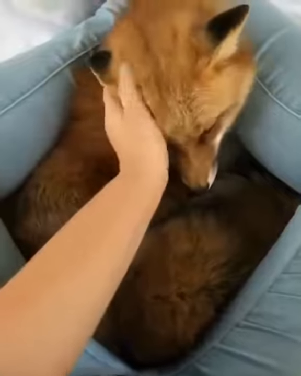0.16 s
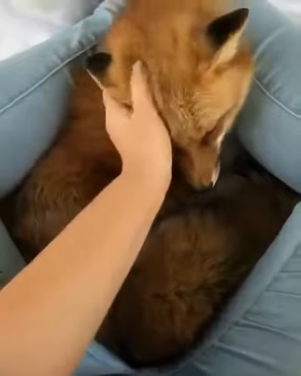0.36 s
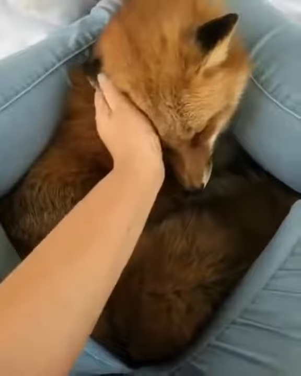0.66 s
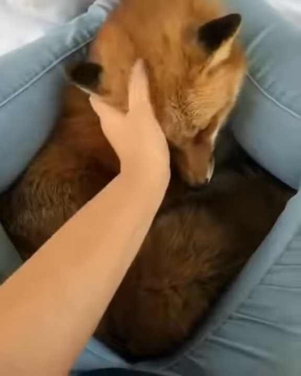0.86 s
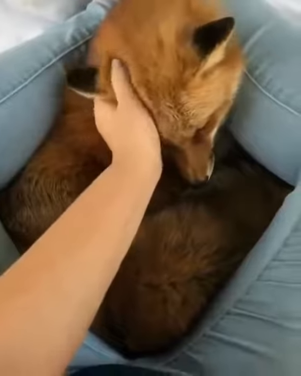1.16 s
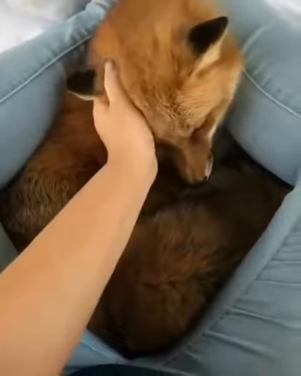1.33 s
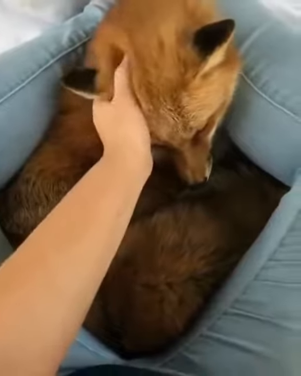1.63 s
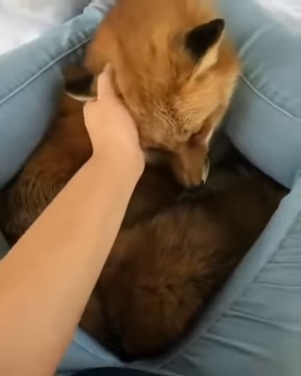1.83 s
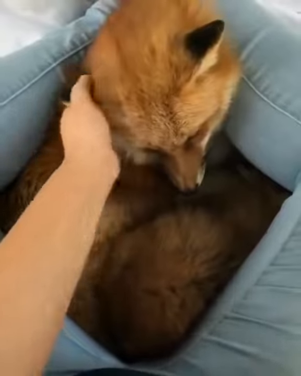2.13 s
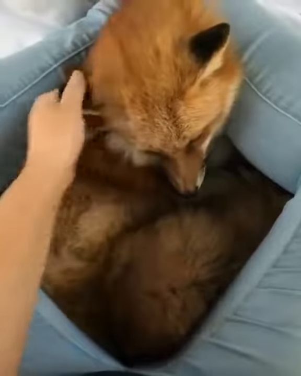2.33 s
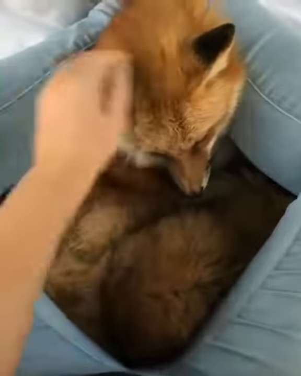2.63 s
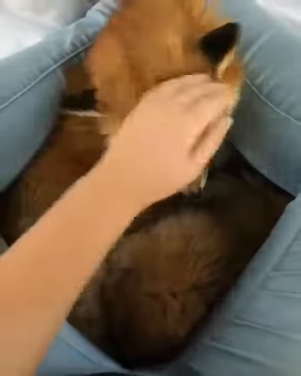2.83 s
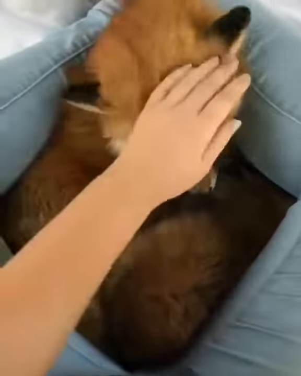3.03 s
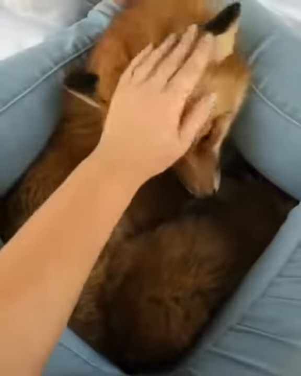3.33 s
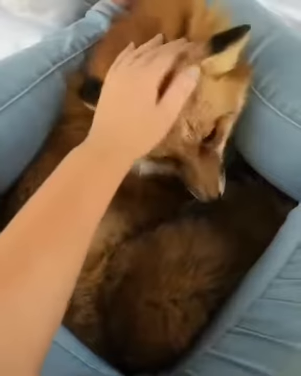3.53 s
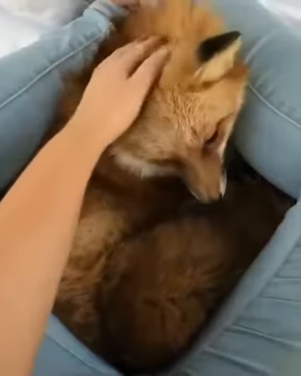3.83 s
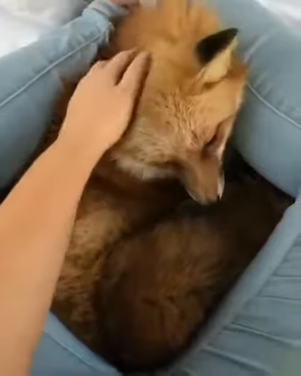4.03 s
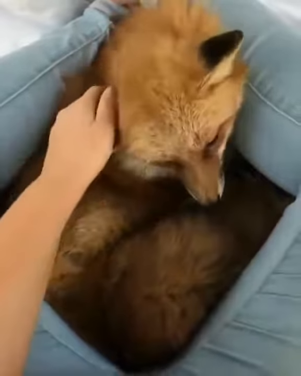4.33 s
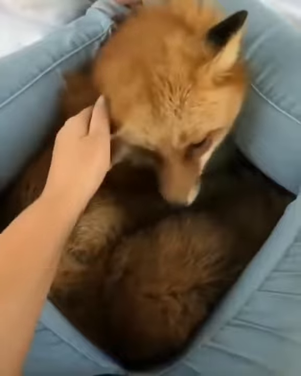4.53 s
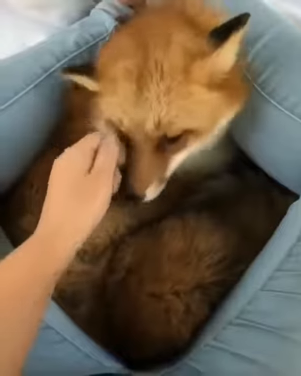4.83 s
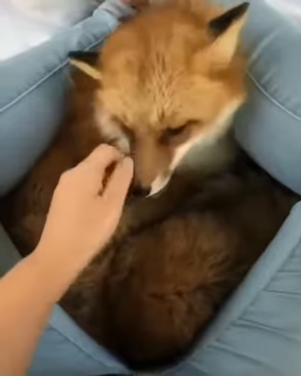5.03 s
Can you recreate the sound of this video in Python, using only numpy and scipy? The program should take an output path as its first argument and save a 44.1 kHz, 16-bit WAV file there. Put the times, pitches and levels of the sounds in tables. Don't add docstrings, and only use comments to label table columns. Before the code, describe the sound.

A fox whines softly and waveringly through its closed muzzle close by, then louder and rougher with clicks and brief yips, in a quiet room.

```python
import sys
import numpy as np
from scipy import signal
from scipy.io import wavfile
from scipy.ndimage import uniform_filter1d

SR = 44100
rng = np.random.default_rng(int(sys.argv[2]) if len(sys.argv) > 2 else 0)


def field_ratio(decibels):
    return 10 ** (np.asarray(decibels, dtype=float) / 20)


def pcm_store(signal):
    levels = np.round(np.clip(np.atleast_2d(signal), -1, 1) * 32767)
    wavfile.write(sys.argv[1], SR, levels.astype(np.int16).T)


N = 228310

# f/Hz, level/dB
HISS = [(18, -76), (30, -48), (59, 2), (141, -7), (174, 3), (203, -10), (349, -10.5), (501, -20.5),
        (648, -17.5), (1520, -14), (1780, -19), (3220, -18), (4160, -23), (5300, -25.5), (13300, -29.5),
        (14400, -25)]
# f/Hz, width/Hz, level/dB
HUMS = [(56.5, 1.5, -75), (145, 25, -76)]

# (side line level/dB, [(t/s, pitch f/Hz, pitch line level/dB)]) clean notes, quiet in the
CLEAN = [
    (-45, [(.062, 522, -59), (.095, 544, -55.5), (.11, 527, -56), (.13, 468.4, -49), (.155, 451.7, -49), (.2, 435.4, -45), (.235, 423, -44.5)]),
    (-42.5, [(0.356, 352.5, -47), (0.365, 359, -41.5), (0.44, 335.8, -42.5), (0.468, 344, -39), (0.486, 362.6, -42.5), (0.494, 368, -35.5), (0.505, 408, -57)]),
    (-56, [(.985, 280.6, -44), (1.022, 299.4, -44), (1.032, 302, -72)]),
    (-41.5, [(1.296, 343.4, -59), (1.303, 315.7, -42.5), (1.324, 237, -52.5), (1.41, 258.6, -50), (1.445, 242, -52.5), (1.524, 265.4, -50), (1.72, 250.2, -49.5), (1.752, 258.4, -44), (1.772, 230, -53)]),
    (-46.5, [(2.058, 351.5, -67), (2.066, 351.4, -41), (2.082, 288.6, -46.5), (2.12, 244, -53), (2.14, 237.2, -54)]),
    (-50, [(2.285, 258.5, -47), (2.32, 221.5, -52.5), (2.345, 236.4, -52), (2.352, 246, -41.5), (2.366, 254.7, -69)]),
         (-41, [(3.158, 375, -38), (3.175, 392.7, -36.5), (3.195, 440, -38), (3.213, 443, -48)]),
    (-39.5, [(3.217, 421, -41), (3.228, 416, -33), (3.24, 444, -32.5), (3.25, 481, -45)]),
    (-40, [(3.372, 455, -40), (3.385, 454.6, -37.5), (3.41, 457, -39.5), (3.42, 450, -42)]),
    (-64, [(4.055, 423.6, -73), (4.075, 396.5, -30.5), (4.1, 283.4, -35), (4.12, 230, -43.5), (4.145, 185, -44)]),
    (-59, [(4.448, 250.6, -69), (4.46, 272, -38.5), (4.471, 298.6, -41)]),
    (-45, [(4.64, 254.1, -34), (4.667, 296.1, -38), (4.705, 357.8, -38.5), (4.713, 379.6, -41), (4.721, 382, -54)]),
    (-44.5, [(4.723, 399, -36), (4.735, 405.3, -48), (4.745, 416.3, -38), (4.765, 425.6, -39), (4.778, 416.6, -30), (4.8, 415, -30.5), (4.824, 348, -31), (4.845, 434.8, -31), (4.86, 440, -42.5)]),
    (-35, [(5.018, 496, -52), (5.034, 515, -46.5), (5.045, 530.7, -49.5), (5.065, 542.7, -51.5), (5.09, 506.3, -44), (5.125, 482.3, -45), (5.14, 513, -46), (5.148, 545, -75)]),
]
HALVED = [
    (-53.5, [(0, 278, -64.5), (.04, 233.8, -63.5), (.068, 291.5, -52.5)]),
    (-50, [(.232, 283, -50.5), (.27, 317.3, -51), (.3, 228.4, -59), (.33, 233.8, -58.5), (.36, 250, -58.5)]),
    (-54, [(.855, 271, -54.5), (.9, 241.5, -54.5), (.94, 246, -56), (.99, 282.3, -51.5)]),
    (-55, [(1.386, 245.6, -79), (1.405, 251.3, -72)]),
    (-55, [(2.135, 230, -67), (2.17, 254.3, -55.5), (2.2, 288.6, -56.5), (2.213, 225, -59.5), (2.24, 250, -56.5), (2.265, 273, -51.5), (2.295, 282, -61)]),
    (-43.5, [(4.12, 250.3, -39.5), (4.14, 255, -40), (4.162, 250, -44.5), (4.185, 260.7, -41.5), (4.21, 281, -55)]),
    (-37, [(4.568, 305.7, -34.5), (4.583, 282.5, -39), (4.6, 243.2, -34.5), (4.62, 246.2, -37), (4.642, 254, -35)]),
    (-40.5, [(4.953, 304, -37), (4.97, 304.4, -36), (4.99, 288, -39.5), (5.0, 313, -42.5), (5.01, 370, -39)]),
]
THIRDS = [
    (-58, [(4.058, 435.3, -38.5), (4.085, 466, -40.5), (4.125, 363, -34.5)]),
    (-37, [(4.906, 335, -42), (4.918, 342.4, -32), (4.94, 336, -34), (4.955, 325, -35.5)]),
]
BEATING = [
    (-43.5, [(3.012, 345.3, -36.5), (3.032, 357, -36), (3.052, 366.8, -31.5), (3.064, 339.4, -30.5), (3.074, 333.8, -29.5), (3.12, 340.1, -34), (3.138, 344.5, -33), (3.152, 377.4, -36), (3.162, 380.7, -31)]),
    (-47.5, [(3.248, 360.3, -35), (3.256, 378.4, -33), (3.28, 382.4, -33.5), (3.294, 354.6, -33.5), (3.33, 356.7, -36), (3.344, 393.8, -36), (3.358, 387.4, -34.5), (3.37, 436.3, -38.5), (3.378, 430, -36)]),
    (-63, [(3.418, 416, -35), (3.434, 411.4, -36.5), (3.458, 434.4, -36.5), (3.474, 381, -35.5), (3.504, 431, -36.5), (3.532, 400.5, -37), (3.576, 401, -32), (3.585, 412, -35.5), (3.596, 356.5, -31), (3.606, 341, -36), (3.615, 323.7, -55)]),
]
SWELL_SHARES = [0.13, 1, 0.83, 0.12]
# f/Hz, level/dB
MUZZLE = [(70, -11), (125, -6.5), (380, 11), (560, -6), (720, -16.5), (1050, -23.5), (1650, -22.5),
          (2750, -29.5), (3200, -34.5), (7000, -62)]
# t/s, overtone level/dB, extra tilt/(dB per octave), nasal dip f/Hz,
# upper over middle throat resonance level/dB
SHAPE = [(0, 16.5, 2, 3380, 1), (.09, 1.5, 2, 3400, 10), (.2, 9, -4, 2500, 6), (.36, 7, 1, 1576, 0),
         (0.501, 6, 0.5, 1557, -5), (0.9, -1.5, 5, 1200, 2.5), (1.3, -15.5, 1.5, 888.5, 19.5),
         (2.3, 2.5, -2, 760.7, -7), (3.0, 1, 6, 2328, 18.5), (3.07, 8, -4, 2360, 8),
         (3.2, 0.5, 1, 2220, -9), (3.4, 0, 4, 2170, 3), (3.6, 21, -12, 2295, -1), (4.1, -6, 1, 2266, 1),
         (4.63, 12.5, -9.5, 1998, -6), (4.69, 7, -0.5, 2000, 8), (4.78, 6, 2, 2188, 4),
         (4.86, 6, 1.5, 2202, 0), (4.93, -9, 8, 2196, 11.5), (4.99, -2, 4.5, 2280, 9.5),
         (5.04, 8.5, -4.5, 3170, 11), (5.14, -1, -0.5, 2707, 7)]
# t/s, resonance f/Hz
FLARE = [(.04, 5600), (.09, 5480), (0.442, 5210), (.49, 6560), (.6, 5360), (2.998, 5420), (3.06, 6270),
         (3.11, 6450), (3.165, 6052), (3.2, 4284), (3.234, 5533), (3.27, 6800), (3.35, 6080), (4.0, 5647),
         (4.9, 6120), (5.03, 5450), (5.071, 5100), (5.13, 5860)]

# (fizz beside the flow level/dB, [(t/s, airflow
# level/dB, nose over throat level/dB)])
BREATHS = [
    (-7.5, [(0, -69, -24), (.055, -63, -4.5), (.09, -79, -5), (.22, -72, -32), (.26, -65, -11), (.4, -71.5, -6), (.47, -72, 6), (.5, -70, 4), (.52, -70, -4)]),
    (-12, [(.82, -71, -8), (.87, -67.5, -9), (.91, -69.5, 2), (.95, -63, -3), (.99, -68, -4), (1.04, -82, 0)]),
    (4, [(2.15, -90, 2), (2.22, -82, 3), (2.37, -78, 8)]),
           (-8.5, [(3.005, -71, -5), (3.03, -57, -6), (3.055, -55, -3), (3.11, -64.5, -6.5), (3.165, -61.5, -1), (3.22, -63, -10), (3.27, -61.5, -8), (3.35, -59, -4), (3.395, -64.5, -6), (3.45, -58.5, -3), (3.55, -61, -16), (3.62, -67, 1)]),
    (-13, [(4.04, -52, -11), (4.066, -48, -10), (4.11, -55.5, -19), (4.21, -77, 5)]),
    (0, [(4.495, -58, -7), (4.508, -63, -10), (4.53, -64, -10)]),
    (-3.5, [(4.556, -47, -17), (4.572, -48, -14)]),
    (-7.5, [(4.58, -45, -21), (4.6, -50, -27), (4.65, -56.5, -28), (4.7, -64.5, -9.5), (4.77, -61, -31), (4.815, -52, 2.5), (4.86, -65, -18)]),
    (-6.5, [(4.87, -39.5, -13), (4.885, -52.5, -9), (4.903, -44, -13), (4.918, -50.5, -18), (4.938, -49.5, -27), (4.95, -52.5, -20), (4.97, -57.5, -16), (5.0, -61, -28), (5.025, -63, -22), (5.06, -70, 11), (5.09, -61, 4), (5.12, -65, -3), (5.165, -71, -1)]),
]
# f/Hz, width/Hz, level/dB, share of the shape's upper level they follow
THROAT = [(705, 310, 17.5, -0.11), (1263, 280, 20, -0.2), (1690, 240, 13, 1), (2850, 330, 15, 0.023),
          (2583, 130, 13, -0.043)]
# f/Hz, width/Hz, level/dB
NOSTRILS = [(5515, 220, -2)]
# f/Hz, width/Hz, level/dB
FIZZ = [(6760, 21400, 15), (9000, 1400, 15), (11300, 2500, -30)]

# t/s, length/s, start f/Hz, end f/Hz, level/dB
THIN = [(0.493, 0.028, 3850, 3100, -66.5), (0.558, 0.019, 3230, 3440, -67),
        (0.584, 0.021, 3310, 2870, -67.5), (0.66, 0.037, 3350, 2720, -72),
        (0.691, 0.035, 2850, 3310, -64.5), (0.721, 0.0175, 3310, 3920, -66.5),
        (0.732, 0.018, 3900, 4160, -69), (0.814, 0.031, 3440, 3140, -67), (1.007, 0.032, 3350, 3338, -67.5),
        (1.06, 0.062, 3370, 3360, -77), (1.159, 0.039, 2443, 2680, -69.5), (1.211, 0.096, 2643, 2710, -77),
        (1.312, 0.035, 3194, 3100, -71), (2.212, 0.026, 3450, 3250, -78), (2.232, 0.045, 3230, 3230, -65),
        (2.309, 0.066, 3247, 3260, -77), (2.461, 0.029, 3620, 3050, -63), (2.804, 0.024, 3610, 3140, -64),
        (2.943, 0.049, 3430, 3590, -72), (3.571, .21, 3450, 3594, -68.5), (3.912, 0.099, 2994, 2872, -67.5)]
# t/s, length/s, start f/Hz, end f/Hz, level/dB
BLURRED = [(1.29, 0.072, 3520, 3260, -75), (1.385, 0.057, 2833, 2690, -68.5),
           (1.703, 0.11, 3640, 2930, -69), (1.839, 0.12, 3190, 2920, -72), (2.005, 0.041, 4115, 3980, -75),
           (2.03, 0.083, 3680, 3630, -77), (2.095, 0.057, 4090, 4190, -79), (2.14, 0.065, 4133, 3955, -71),
           (2.171, 0.075, 3734, 3240, -67), (2.48, 0.085, 3470, 3480, -72),
           (2.59, 0.059, 3600, 3380, -76.5), (2.76, 0.046, 3400, 3700, -80),
           (2.825, 0.078, 3520, 3480, -87), (2.895, 0.089, 3750, 4500, -73.5)]
# t/s, level/dB
PHRASES = [
    (0.16, -74),
    (1.326, -73),
    (2.444, -72.5),
    (3.619, -73.5),
]
# delay t/s, length/s, start f/Hz, end f/Hz, width/Hz, level/dB
PHRASE = [
    (0, 0.042, 8140, 7660, 302, 4.5),
    (.17, .16, 7000, 5880, 800, 0),
]

# t/s, peak level/dB, ring f/Hz
CREAKS = [(0.785, -44, 393), (0.82, -43, 360), (0.839, -43.5, 383), (2.9, -47.5, 333), (2.99, -45, 345),
          (3.006, -36.5, 174.2), (3.872, -37, 278), (3.888, -31, 293), (3.9, -36, 362.7),
          (4.471, -42.5, 371.7), (4.473, -43.5, 169.2), (4.481, -54, 360), (4.512, -57, 190),
          (4.892, -36, 591.3), (4.899, -43, 646.4), (5.149, -48.5, 420)]
# t/s, peak level/dB, ring f/Hz
CLICKS = [
    (3.007, -45.5, 5510),
    (4.5075, -52, 9000),
    (4.548, -46, 11800),
    (3.0276, -40.5, 5540),
    (3.043, -43, 5800),
    (3.0537, -39, 6400),
    (4.507, -35, 2920),
    (4.5483, -20, 2660),
    (4.562, -29, 2470),
]
# [(t/s, pitch f/Hz, level/dB)]
SECOND = [
    [(3.02, 480, -53.5), (3.045, 504.3, -39.5), (3.062, 520, -53.5)],
    [(3.066, 419, -61), (3.09, 431.4, -46), (3.112, 400.7, -52), (3.135, 401, -50)],
    [(3.145, 334.8, -52), (3.158, 347, -45), (3.175, 352, -41), (3.19, 368.3, -44)],
    [(3.262, 309.3, -46), (3.285, 302.5, -41), (3.31, 289.5, -52), (3.325, 300, -63)],
    [(3.332, 349, -52), (3.35, 347, -45), (3.37, 351.3, -41), (3.383, 365, -58)],
    [(3.42, 349.8, -48), (3.45, 351.8, -40.5), (3.475, 331.3, -45), (3.495, 338.7, -43.5), (3.52, 353, -50),
     (3.55, 334.6, -45), (3.575, 352, -42), (3.588, 360, -46), (3.596, 360, -55)],
]
# t/s, peak level/dB, pulse f/Hz, length/s, mouth shape (factor on its resonances)
YIPS = [
    (4.025, -43, 740, 0.001, 0.78),
    (4.0284, -21.5, 512, 0.0082, 1.01),
    (4.039, -28.5, 580, 0.018, 0.98),
    (4.545, -36.5, 670, 0.0064, 1.1),
    (4.5666, -31, 430, 0.0063, 1.01),
    (4.8699, -35, 660, 0.0029, 1.29),
    (4.874, -31.5, 510, 0.0082, 1.05),
    (4.889, -37.5, 500, 0.0024, 1.3),
    (4.896, -26.5, 550, 0.007, 1.263),
]
# f/Hz, width/Hz, level/dB
MOUTH = [(522.9, 372, 4.5), (1141.7, 362, 6), (1666, 312, 7), (2117, 713, 12.5), (2694, 171, 3),
         (5150, 1630, -27), (8270, 1310, -27), (12200, 3900, -36)]


def evened(x):
    return x / np.sqrt(np.mean(x ** 2) + 1e-20)


def read(points, hz):
    f, value = np.transpose(points)
    return np.interp(np.log(hz + 1), np.log(f + 1), value)


def add(mix, s, sound):
    part = mix[round(s * SR):][:len(sound)]
    part += sound[:len(part)]


def resonate(x, hz, width):
    turn = np.exp(2j * np.pi * np.cumsum(hz * np.ones(len(x))) / SR)
    r = np.exp(-np.pi * width / SR)
    return 2 * (turn * signal.lfilter([1 - r], [1, -r], x / turn)).real


def tract(x, modes):
    return sum(field_ratio(db) * resonate(resonate(x, hz, width), hz, width) for hz, width, db in modes)


def drift(seconds):
    size = round(seconds * SR)
    return evened(uniform_filter1d(uniform_filter1d(rng.standard_normal(N), size), size))


def curves(table):
    s, *columns = np.transpose(table)
    return np.array([np.interp(np.arange(N) / SR, s, c) for c in columns])


def played(tables, edge_s):
    gate = np.zeros(N)
    for rows in tables:
        gate[round(rows[0][0] * SR):round(rows[-1][0] * SR) + 1] = 1
    return uniform_filter1d(gate, round(edge_s * SR)), curves(np.vstack(tables))


def sunk_db(nostril_hz):
    return -16 * np.maximum(5100 - nostril_hz, 0) / 1000


def hiss():
    frames, hz = N // 256 + 5, np.fft.rfftfreq(1024, 1 / SR)
    a, b, patches = rng.standard_normal((frames, 513, 3)).T
    patches = evened(uniform_filter1d(uniform_filter1d(patches, 14, 0), 12, 1))
    spectrum = (a + 1j * b) * field_ratio(read(HISS, hz)[:, None] + 2.5 * patches)
    bed = signal.istft(spectrum, nperseg=1024, noverlap=768)[1][:N]
    return field_ratio(-64) * evened(bed)


def hums():
    return sum(field_ratio(db) * evened(tract(rng.standard_normal(N), [(hz, width, 0)])) for hz, width, db in HUMS)


def with_side_lines(notes, follow):
    tables = []
    for side_db, rows in notes:
        rows = np.array(rows)
        level_db = rows[:, 2]
        side = side_db + follow * (level_db - level_db.mean()) - level_db
        tables.append(np.c_[rows, side, rows[:, 0] - rows[0, 0]])
    return tables


def voice(notes, cycles, rough, under_db, follow):
    gate, (hz, level_db, side_db, age) = played(with_side_lines(notes, follow), 0.0079)
    on = gate > 0
    hz = (hz * (1 + 0.2475 * rough * drift(0.00271)))[on]
    side_db, age = side_db[on], age[on]
    turn, out = 2 * np.pi * np.cumsum(hz) / SR / cycles, np.zeros(N)
    nostril_hz = curves(FLARE)[0][on]
    lift_db, tilt_db, dip_hz, _ = curves(SHAPE)[:, on]
    tilt_db = tilt_db - 0.5 - 13 * age
    swells = [drift(0.0049)[on] for _ in range(7)]
    for k in range(1, 17 * cycles):
        steps = min(k % cycles, -k % cycles)
        if steps > 2 or (steps and k > 4 * cycles) or 3 * k < cycles:
            continue
        line_hz = hz * k / cycles
        db = read(MUZZLE, line_hz) - read(MUZZLE, hz) - 0.73 * max(steps - 1, 0)
        if k < cycles:
            db = db + under_db
        if k != cycles and (steps or cycles == 1):
            db = db + side_db
        if cycles > 1 and k > 1.55 * cycles:
            db = db - 7
        db = db + (27 + sunk_db(nostril_hz)) * np.exp(-((line_hz - nostril_hz) / 550) ** 2)
        db = db + tilt_db * np.log2(max(k / cycles, 1))
        if k > 1.7 * cycles:
            nasal_dip_db = -10.5 * np.exp(-((line_hz - dip_hz) / 320) ** 2)
            swell_in_db = -11 * np.exp(-age / .01)
            db = db + lift_db + nasal_dip_db + swell_in_db
        waver = 1 + (rough * (1.6 if steps else .6) + 0.022 * (k / cycles - 1)) * swells[k % 7]
        out[on] += field_ratio(db) * waver * np.cos(k * turn + rng.uniform(0, 2 * np.pi))
    return np.sqrt(2) * field_ratio(level_db) * gate * out


def whine():
    clean, halved, thirds, beating = SWELL_SHARES
    return (voice(CLEAN, cycles=1, rough=.03, under_db=0, follow=clean)
            + voice(HALVED, cycles=2, rough=.18, under_db=0, follow=halved)
            + voice(THIRDS, cycles=3, rough=.12, under_db=-19, follow=thirds)
            + voice(BEATING, cycles=6, rough=.21, under_db=-9, follow=beating))


def puffs(opening, depth, gust_db, gust_s):
    return rng.standard_normal(N) * field_ratio(gust_db * drift(gust_s)) * (1 + depth * opening)


def breath(folds):
    breaths = [[row + (fizz_db,) for row in rows] for fizz_db, rows in BREATHS]
    gate, (flow_db, nose_db, fizz_db) = played(breaths, 0.018)
    nostril_hz, upper_db = curves(FLARE)[0], curves(SHAPE)[-1]
    by_throat = 1 / np.sqrt(1 + field_ratio(2 * nose_db))
    opening = np.maximum(folds, 0) ** 2 / (uniform_filter1d(folds ** 2, 900) + 1e-7)
    throat_modes = [(hz, width, db + share * upper_db) for hz, width, db, share in THROAT]
    nose_modes = NOSTRILS + [(nostril_hz, 1100, sunk_db(nostril_hz))]
    throat = by_throat * evened(tract(puffs(opening ** 1.2, 1.8, 1.3, .008), throat_modes))
    nose = by_throat * field_ratio(nose_db) * evened(tract(puffs(opening, 1.8, 1.3, .008), nose_modes))
    fizz = field_ratio(fizz_db) * evened(tract(puffs(opening, .5, 1.6, .012), FIZZ))
    return gate * field_ratio(flow_db) * (throat + nose + fizz)


def room(x, t60=0.085):
    t = np.arange(200, 8000, 22) + rng.integers(0, 22, 355)
    taps = np.zeros(8100)
    taps[t] = rng.choice([-1., 1.], 355) * field_ratio(-60 * t / SR / t60)
    return signal.fftconvolve(x, taps / np.linalg.norm(taps))[:N]


def birds():
    out = np.zeros(N)
    notes = [row[:4] + (60, row[4]) for row in THIN]
    notes += [row[:4] + (340, row[4]) for row in BLURRED]
    notes += [(s + part[0], *part[1:5], db + part[5]) for s, db in PHRASES for part in PHRASE]
    for s, length, start_hz, end_hz, width, db in notes:
        size = round(length * SR)
        hz = np.linspace(start_hz, end_hz, size)
        blur = evened(tract(rng.standard_normal(size), [(hz, width, 0)]))
        tone = np.exp(-(width / 90) ** 2) * 2.5 * np.sin(2 * np.pi * np.cumsum(hz) / SR)
        add(out, s, field_ratio(db) * evened(blur + tone) * signal.windows.tukey(size, .5))
    return out


def creaks():
    out, t = np.zeros(N), np.arange(1200) / SR
    swell = (t / 0.0051) ** 3 * np.exp(3 - 3 * t / 0.0053)
    for s, db, hz in CREAKS:
        add(out, s - .002, field_ratio(db) * swell * np.sin(2 * np.pi * hz * t))
    return out


def clicks():
    out, t = np.zeros(N), np.arange(400) / SR
    tick = 0.36 * np.diff(np.exp(-t / .00006), prepend=0)
    for s, db, hz in CLICKS:
        ring = np.exp(-t / 0.0008) * np.sin(2 * np.pi * hz * t)
        add(out, s, field_ratio(db) * (ring + tick))
    return out


def second_vibration():
    gate, (hz, level_db) = played(SECOND, 0.0067)
    turn = 2 * np.pi * np.cumsum(hz * (1 + .03 * drift(0.0045))) / SR
    return np.sqrt(2) * gate * field_ratio(level_db) * (1 + .25 * drift(0.0095)) * np.cos(turn)


def yips():
    out, t = np.zeros(N), np.arange(2500) / SR
    rasp = 0.53
    for s, db, rate, length, mouth in YIPS:
        pulses = -evened(np.diff(np.floor(t * rate + 0.845), prepend=0))
        noise = rng.standard_normal(len(t))
        swell = np.minimum(t / 0.0024, 1) * np.exp(-(t / length) ** 2)
        treble_db = 54 * (mouth - 1)
        modes = [(hz * mouth, width, gain_db + (treble_db if hz > 4000 else 0)) for hz, width, gain_db in MOUTH]
        burst = tract(((1 - rasp) * pulses + rasp * noise) * swell, modes)
        add(out, s - .001, field_ratio(db) * burst / abs(burst).max())
    return out


def scene():
    folds = whine()
    fox = folds + breath(folds) + creaks() + second_vibration()
    bursts, song = clicks() + yips(), birds()
    echoes = field_ratio(-19) * room(fox) + field_ratio(-16.5) * room(bursts) + field_ratio(-8) * room(song, t60=0.4)
    return (hiss() + hums() + fox + bursts + song + echoes)[None]


def low_pass(x):
    return signal.sosfilt(signal.butter(12, 14530, fs=SR, output="sos"), x)


def record(dry):
    fade = np.clip((N - np.arange(N)) / SR / .005, 0, 1)
    bass_cut = signal.butter(3, 40, "highpass", fs=SR, output="sos")
    top_cut = signal.firwin(401, 13950, window=("kaiser", 8), fs=SR)
    heard = signal.oaconvolve(signal.sosfilt(bass_cut, dry), top_cut[None], "same")
    return low_pass(heard * fade)


dry = scene()
out = record(dry)
pcm_store(out)
```